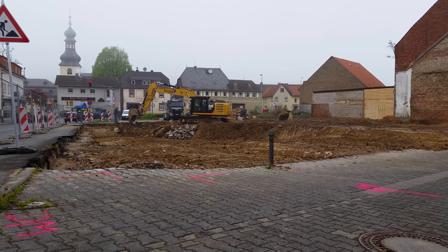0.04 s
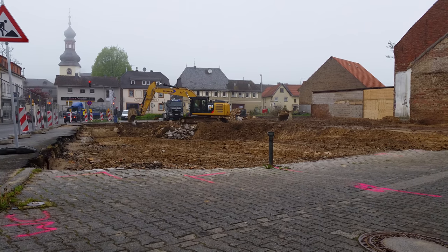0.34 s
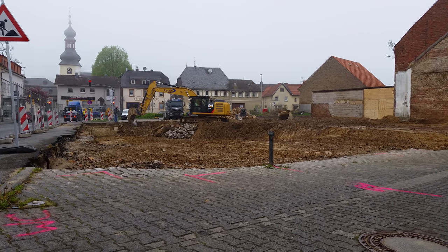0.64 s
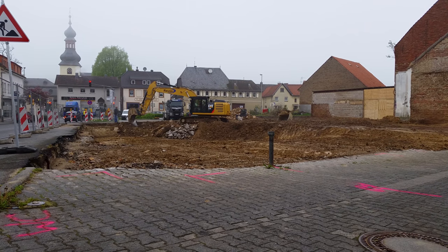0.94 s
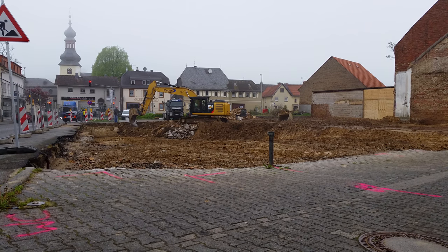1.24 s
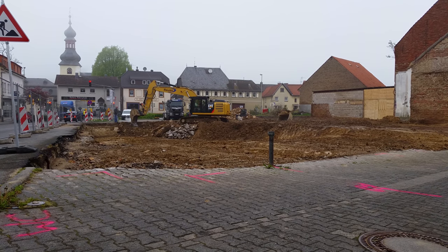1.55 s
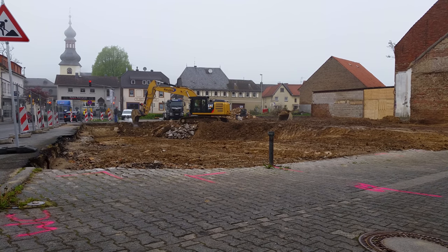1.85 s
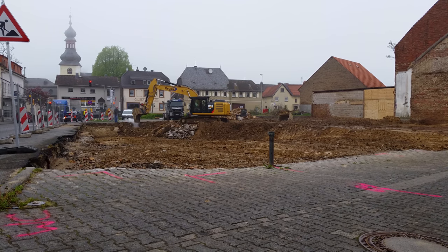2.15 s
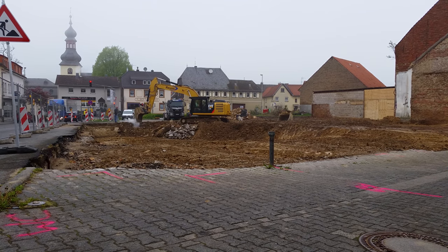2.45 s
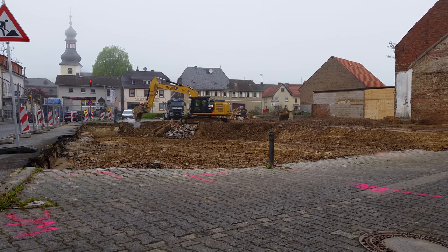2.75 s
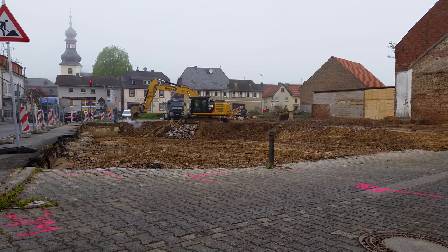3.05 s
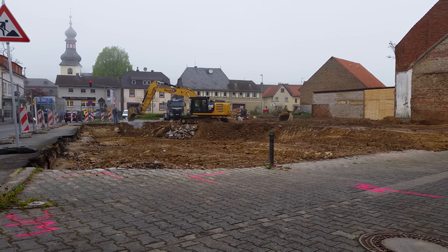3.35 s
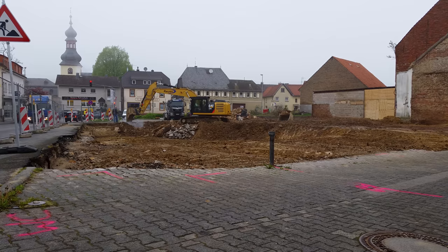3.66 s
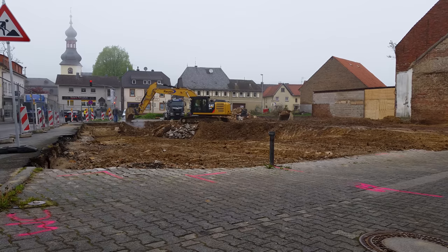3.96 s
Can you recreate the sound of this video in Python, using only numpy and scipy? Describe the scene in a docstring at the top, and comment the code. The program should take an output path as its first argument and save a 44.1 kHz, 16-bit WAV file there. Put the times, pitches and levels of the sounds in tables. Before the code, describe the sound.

An excavator some way off tips rumbling rubble into a lorry, with low traffic behind.

```python
"""A building site in town: some way off, an excavator tips two loads of rubble into a steel lorry bed.
The rubble rumbles and crashes, lumps make the bed boom and rattle, and stones clink on the bucket.
The excavator's diesel drones and its hydraulic pump whines; a road vehicle speeds up in far traffic.
Grit crackles briefly near the microphones, over a fine steady hiss."""
import sys
import numpy as np
from scipy import signal
from scipy.fft import rfft, irfft
from scipy.io import wavfile
from scipy.ndimage import uniform_filter1d

SR = 44100
rng = np.random.default_rng(int(sys.argv[2]) if len(sys.argv) > 2 else 0)


def put_to_file(sound):
    """Save the sound as 16-bit audio at rate SR, in the file named by the first command-line argument."""
    columns = np.atleast_2d(sound).T  # one column per channel
    safe = np.clip(columns, -1, 1)
    whole_steps = np.round(safe * 32767)
    wavfile.write(sys.argv[1], SR, whole_steps.astype(np.int16))


N = 176400
T = np.arange(N) / SR


def undb(db):
    """Turn decibels into a number to multiply by."""
    return 10 ** (np.asarray(db) / 20)


def unit(x):
    """Scale a signal to an average strength (rms) of 1."""
    return x / np.sqrt(np.mean(x ** 2))


def curve(rows, column=1):
    """Join the values in one column of a table with straight lines over time."""
    rows = np.array(rows)
    return np.interp(T, rows[:, 0], rows[:, column])


def gains(points):
    """The gain at every frequency, from (frequency [Hz], level [dB]) points."""
    hz, db = np.array(points).T
    return undb(np.interp(np.log(np.arange(N // 2 + 1) * SR / N + 1), np.log(hz), db))


def colour(x, points):
    """Shape the bass and treble of a sound, then scale it to strength 1."""
    return unit(irfft(rfft(x) * gains(points), N))


def wander(rate_hz):
    """A smooth random wiggle of strength 1 that heads for a new value rate_hz times a second."""
    hold = int(SR / rate_hz)
    steps = np.repeat(rng.standard_normal(N // hold + 3), hold)
    return unit(uniform_filter1d(uniform_filter1d(steps, hold), hold)[hold:hold + N])


def swell(start, rise, hold, fall):
    """Rise from start, stay up until start + hold, then die away (all in seconds)."""
    return np.clip((T - start) / rise, 0, 1) * np.exp(-np.maximum(T - start - hold, 0) / fall)


# How wide the sound is between the two microphones (frequency [Hz], side minus middle [dB])
STEREO_WIDTH = [(60, -21), (200, -14), (370, -5.5), (670, -5), (1230, 5), (2260, -1), (4140, 0.5),
                (13000, -2.5)]
def spread(pair):
    """Mix two unrelated signals into left and right: alike in the bass, wide higher up."""
    width = gains(STEREO_WIDTH)
    weights = np.array([np.ones_like(width), width]) / np.sqrt(1 + width ** 2)
    mid, side = irfft(rfft(pair) * weights, N)
    return np.array([mid + side, mid - side])


def place(tone, hz):
    """A tone reaches the two microphones out of step, more so where the sound is wide."""
    gap = np.arctan(gains(STEREO_WIDTH)[int(hz * N / SR)])
    return np.sqrt(2) * np.array([(tone * np.exp(1j * gap)).imag, (tone * np.exp(-1j * gap)).imag])


def wide_noise(points):
    """Stereo noise with the given tone colour."""
    return colour(spread(rng.standard_normal((2, N))), points)


def clatter(hits_per_s, uneven_db, echo_s=0.017):
    """Many tiny random knocks, smeared by echoes from the house fronts around the site."""
    hits = (rng.random(N) < hits_per_s / SR) * rng.standard_normal(N)
    hits *= undb(uneven_db * np.minimum(rng.exponential(size=N), 3))
    echo = rng.standard_normal((2, SR // 8)) * np.exp(-np.arange(SR // 8) / SR / echo_s)
    return spread(signal.fftconvolve(hits[None], echo, axes=1)[:, :N])


# Slides of loose rubble (start [s], length [s], level [dB])
SLIDES = [(-.2, 0.9, -28), (0.175, 0.21, -18.5), (1.226, 0.43, -21), (1.69, 0.3, -25)]
def pouring(rise_s=0.11, fall_s=0.19):
    """How strongly the rubble flows at each moment."""
    return np.sqrt(sum((undb(db) * swell(start, rise_s, length, fall_s)) ** 2
                       for start, length, db in SLIDES))


# Tone colour of sliding rubble (frequency [Hz], level [dB])
RUBBLE_COLOUR = [(45, -38), (70, -4), (150, 0.5), (280, -13.5), (380, -9), (570, -13), (650, -21),
                 (1000, -15.5), (1250, -22), (1700, -25), (2800, -34), (4500, -42), (6000, -46.5),
                 (9500, -39.5), (14000, -54.5)]
def rubble():
    """Loose rubble slides in, and its many small knocks blur into a rumble."""
    return pouring() * colour(clatter(hits_per_s=1200, uneven_db=1), RUBBLE_COLOUR)


# Notes the steel bed rings at (pitch [Hz], level [dB], time to fade by 60 dB [s])
BED_NOTES = [(78.2, 0, 0.48), (103.1, 0.5, 0.53), (132, 0.5, 1.1), (154.8, -1.5, 0.54), (175.2, -2.5, 0.36),
             (196.4, -3, 1.4), (211.8, -3.5, 1), (229, -6, 0.5), (258.5, -6.5, 0.89), (323, -6.5, 0.24),
             (384.5, -6, 0.57), (461, -8.5, .9), (516, -9.5, .9), (582, -8.5, 0.71), (737.5, -15, 0.55),
             (1056, -19, .8)]
# Heavy lumps tumbling in the bed (start [s], length [s], level [dB], pitch shaken most [Hz])
TUMBLING_LUMPS = [(-.03, 0.096, -14.5, 132), (-.02, 0.25, -23, 214), (0.2, 0.093, -15.5, 78),
                  (0.3, .13, -22, 128), (0.332, 0.025, -12, 154), (0.35, 0.1, -20, 215),
                  (0.68, 0.05, -19.5, 78.6), (0.74, 0.048, -22, 258), (0.74, 0.18, -28, 196),
                  (1.239, 0.1, -21, 174), (1.297, 0.077, -15, 236), (1.3, 0.12, -17, 320),
                  (1.383, 0.11, -13, 161.4), (1.39, 0.13, -22.5, 385), (1.503, 0.12, -14.5, 320),
                  (1.6, 0.07, -17, 157), (1.617, 0.15, -19.5, 216), (1.67, 0.1, -14.5, 133),
                  (1.786, .12, -20, 160), (1.9, 0.12, -19.5, 122)]
def lorry_bed(flow_db=-11, patchy_db=4.5, rise_s=0.015, reach_octaves=0.092, detune=0.00895, rattle=0.237):
    """The flow stirs every note of the steel, a lump only nearby notes; the load makes them waver."""
    out = 0
    flow = pouring() * undb(flow_db)
    for hz, db, ring_s in BED_NOTES:
        power = (flow * undb(patchy_db * wander(8.3))) ** 2
        for start, length, lump_db, lump_hz in TUMBLING_LUMPS:
            share = np.exp(-0.5 * (np.log2(hz / lump_hz) / reach_octaves) ** 2)
            if share > 0.02:
                shake = swell(start, rise_s, length, ring_s / np.log(1000))
                power += (share * undb(lump_db) * shake) ** 2
        drift = np.exp(2j * np.pi * hz * detune * np.cumsum(wander(8)) / SR)
        tremble = 1 + rattle * (wander(25.18) + 1j * wander(25.34))  # in both loudness and timing
        tone = drift * tremble * np.exp(2j * np.pi * hz * T)
        out += place(undb(db) * np.sqrt(power) * tone, hz)
    return out


def machine_hum(track, tones, wobble, rough):
    """A distant machine hums at multiples of one pitch, each made unsteady by the air and by echoes."""
    hz = curve(track) * (1 + wobble * wander(8))
    phase = 2 * np.pi * np.cumsum(hz) / SR
    out = 0
    for multiple, db in tones:
        tremble = 1 + rough * (wander(21.86) + 1j * wander(22.24))
        out += place(undb(db) * tremble * np.exp(1j * multiple * phase), multiple * hz.mean())
    return out * undb(curve(track, column=2))


# How the excavator's engine runs (time [s], firing rate [Hz], level [dB])
DIESEL_RUN = [(0, 78.4, -20.5), (1.1, 79, -29.5), (1.8, 82.07, -24), (2.3, 83.53, -23), (2.7, 83.96, -25.5),
              (2.92, 87, -32.5), (3.1, 85.36, -25), (4, 87, -31)]
# Tones in its drone (multiple of the firing rate, level [dB])
DIESEL_TONES = [(1, 0.5), (1.252, -10.5), (2.08, -10.5), (4.12, -18)]
def diesel(throb_hz=8.5, throb_depth=0.36):
    """The excavator's cylinders fire so fast that they merge into a throbbing drone."""
    throb_rate = throb_hz * (1 + 0.223 * wander(5.04))
    throb = 1 + throb_depth * np.sin(2 * np.pi * np.cumsum(throb_rate) / SR)
    return throb * machine_hum(DIESEL_RUN, DIESEL_TONES, wobble=0.01183, rough=0.19)


# How the hydraulic pump runs (time [s], pitch [Hz], level [dB])
PUMP_RUN = [(0, 1085, -39), (1.05, 1084, -45), (2, 1080, -41.5), (2.4, 1094, -44), (2.62, 1080, -39.5),
            (2.85, 1111, -41), (3.2, 1092, -42), (3.55, 1066, -41.5), (3.9, 1102, -33.5), (4, 1099, -39)]
# Tones in its whine (multiple of the pitch, level [dB])
PUMP_TONES = [(.76, -9), (1, -2.5)]
def hydraulic_pump():
    """The excavator's spinning pump gives a thin whine."""
    return machine_hum(PUMP_RUN, PUMP_TONES, wobble=0.002207, rough=0.092)


# How the road vehicle's engine runs (time [s], firing rate [Hz], level [dB])
VEHICLE_RUN = [(0, 28.8, -52), (.8, 33.1, -55), (1.4, 38.16, -36), (2, 41.94, -40), (2.55, 46.72, -30),
               (2.95, 49.44, -34), (3.35, 54.47, -30), (4, 59.8, -27.5)]
# Tones in its hum (multiple of the firing rate, level [dB])
VEHICLE_TONES = [(1, -1), (2, -4.5), (3, -6), (4, -11), (5, -10.5), (6, -15)]
def road_vehicle():
    """A vehicle speeds up: its engine fires faster, so the hum climbs."""
    return machine_hum(VEHICLE_RUN, VEHICLE_TONES, wobble=0.0061, rough=0.062)


# Tone colour of the town's traffic (frequency [Hz], level [dB])
TRAFFIC_COLOUR = [(15, -50), (25, -32.5), (90, -0.5), (129, -6.5), (184, -13.5), (210, -15), (240, -14.5),
                  (320, -18.5), (357, -14.5), (391, -23.5), (436, -18), (488, -22), (533, -19.5),
                  (650, -27.5), (1080, -25), (1210, -26), (5000, -43), (6500, -52), (11000, -120)]
# Loudness of the traffic (time [s], level [dB])
TRAFFIC_LEVEL = [(0, -23), (.65, -24.5), (1.15, -25), (2.2, -23.5), (2.7, -23.5), (3.3, -23.5), (4, -23)]
def traffic(flutter_db=0.69):
    """Far traffic blends into a low rumble that flutters lightly."""
    rumble = wide_noise(list(TRAFFIC_COLOUR) + [(7000, -87)])  # almost nothing above 7000 Hz
    return rumble * undb(curve(TRAFFIC_LEVEL) + flutter_db * wander(11))


# Tone colour of the hiss (frequency [Hz], level [dB])
HISS_COLOUR = [(2000, -17), (4000, -9), (5700, -5.5), (6800, 1.5), (7800, -0.5), (9200, 2.5), (10500, 0),
               (12300, -1), (13500, -11), (14500, -21)]
# Loudness of the hiss (time [s], level [dB])
HISS_LOUDNESS = [(0, -43.5), (.65, -48), (1.05, -44), (1.4, -42), (2.6, -41), (2.85, -42.5), (3.2, -41),
                 (4, -42)]
def hiss(flicker_db=0.67):
    """A fine, high hiss that flickers slightly."""
    return wide_noise(HISS_COLOUR) * undb(curve(HISS_LOUDNESS) + flicker_db * wander(29.95))


# Crackles of grit (time [s], level [dB])
CRACKLES = [(.203, -35.5), (0.225, -25.5), (.236, -31), (0.243, -29), (0.261, -25), (0.34, -29.5),
            (.362, -35)]
# Their tone colour (frequency [Hz], level [dB])
CRACKLE_COLOUR = [(2000, -4), (5500, -14), (6800, 1), (8000, -5), (9000, 7), (10500, -0.5), (14000, -4.5)]
def grit(rise_s=0.0018, fade_s=0.005, lean_left_db=2.5):
    """Grit crunches close to the microphones in short, bright bursts."""
    bursts = sum(undb(db) * swell(start, rise_s, rise_s, fade_s) for start, db in CRACKLES)
    left_right = undb(np.array([[lean_left_db], [-lean_left_db]]) / 2)
    return bursts * colour(rng.standard_normal((2, N)), CRACKLE_COLOUR) * left_right


# Stones striking the bucket (time [s], level [dB])
BUCKET_HITS = [(.26, -42.5), (.33, -39), (1.412, -37.5)]
# Notes the bucket rings at (pitch [Hz], level [dB], time to fade by 60 dB [s])
BUCKET_NOTES = [(1446, 5, 0.15), (2250, -6, .14), (2716, 5, 0.12), (3640, -1, 0.11), (6930, -8.5, .3),
                (7170, -8, 0.11)]
# Tone colour of a stone's knock, on the bucket or on the load (frequency [Hz], level [dB])
STONE_COLOUR = [(150, -11), (500, -0.5), (1000, 0.5), (1700, -4), (2800, -8.5), (5000, -18), (9500, -17),
                (14000, -29)]
def bucket_clinks(rise_s=0.008, tick_db=3, tick_fade_s=0.0055, rattle=0.36):
    """Stones tick against the bucket, which rings briefly and unsteadily."""
    ticks = sum(undb(hit_db + tick_db) * swell(start + rise_s / 2, 0.002, 0.002, tick_fade_s)
                for start, hit_db in BUCKET_HITS)
    out = ticks * wide_noise(STONE_COLOUR)
    for hz, db, ring_s in BUCKET_NOTES:
        ring = sum(undb(hit_db + db) * swell(start, rise_s, rise_s, ring_s / np.log(1000))
                   for start, hit_db in BUCKET_HITS)
        tremble = 1 + rattle * (wander(120) + 1j * wander(120))
        out += place(ring * tremble * np.exp(2j * np.pi * hz * T), hz)
    return out


# Stones landing on the load (time [s], level [dB], fade time [s], treble lift [dB per octave])
STONE_FALLS = [(0.321, -23, 0.061, -0.5), (.462, -30.5, .025, -5), (.738, -28, 0.064, 1),
               (1.25, -34, 0.048, -3), (1.35, -24.5, 0.14, -4.5), (1.51, -36, 0.11, 3.5),
               (1.61, -24, 0.1, -7.5), (1.75, -25.5, 0.027, -5), (2.06, -30.5, 0.16, -4.5),
               (2.824, -27.5, 0.08, -2.5), (3.165, -30, 0.085, -2.5)]
def stone_crashes(rise_s=0.015):
    """Single stones crash onto the load, each a burst of clatter, some dull and some bright."""
    knocks = clatter(hits_per_s=2500, uneven_db=0)
    out = 0
    for start, db, fade_s, lift in STONE_FALLS:
        tilted = [(hz, level + lift * np.log2(hz)) for hz, level in STONE_COLOUR]
        out += undb(db) * swell(start, rise_s, rise_s, fade_s) * colour(knocks, tilted)
    return out


def scene():
    """The loading, the machines and the town together."""
    loading = rubble() + lorry_bed()
    machines = diesel() + hydraulic_pump() + road_vehicle()
    return loading + machines + traffic() + hiss() + grit() + bucket_clinks() + stone_crashes()


# How much louder the left microphone is (frequency [Hz], left minus right [dB])
MIC_BALANCE = [(60, -2.5), (110, -1.5), (200, -1), (370, -1.5), (670, 2), (1230, 1.5), (2260, 8),
               (4140, 0.5), (7580, 4.5), (9500, 18), (11500, -2.5), (13900, -3.5)]
def record(dry, ceiling=0.75, top_hz=13900):
    """The two microphones differ in tone; the tallest peaks are rounded and the top treble is cut."""
    lean = np.sqrt(gains(MIC_BALANCE))
    left_right = np.array([lean, 1 / lean]) / np.sqrt((lean ** 2 + lean ** -2) / 2)
    pair = irfft(rfft(dry) * left_right, N)
    rounded = pair / (1 + (pair / ceiling) ** 6) ** (1 / 6)
    treble_cut = signal.ellip(8, 0.2, 80, top_hz, fs=SR, output="sos")
    return signal.sosfilt(treble_cut, rounded)


dry = scene()
out = record(dry)
put_to_file(out)
```